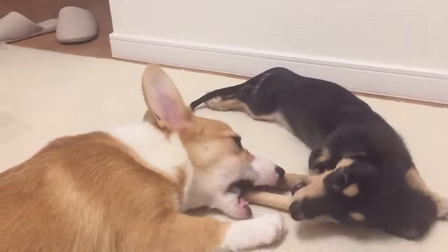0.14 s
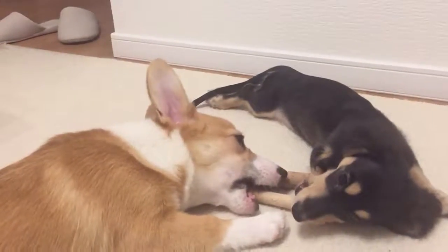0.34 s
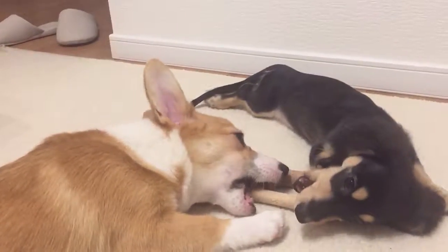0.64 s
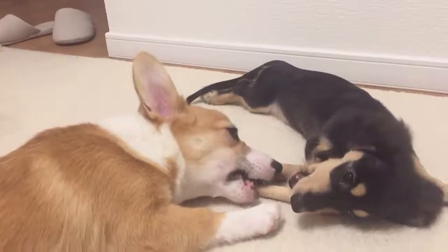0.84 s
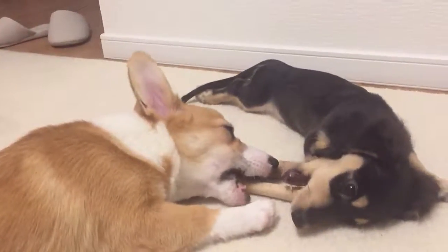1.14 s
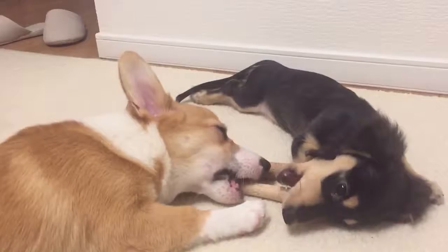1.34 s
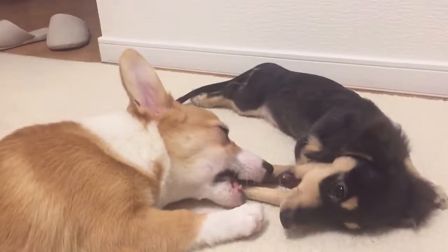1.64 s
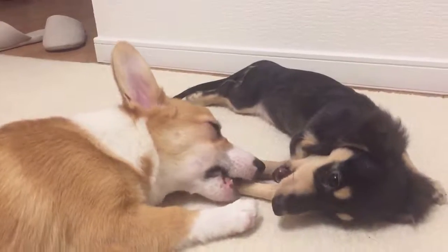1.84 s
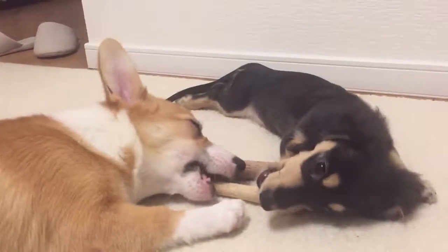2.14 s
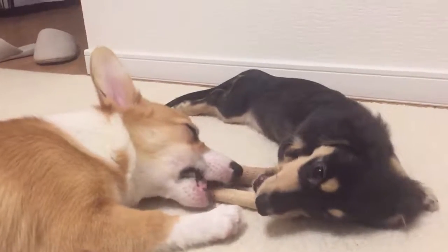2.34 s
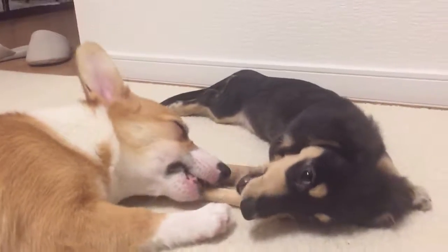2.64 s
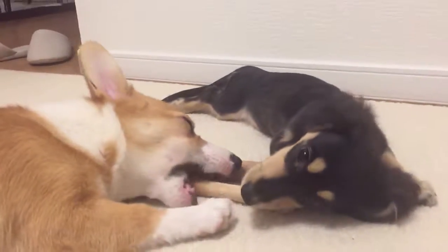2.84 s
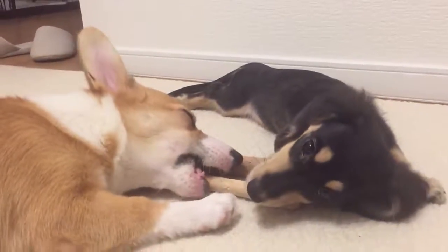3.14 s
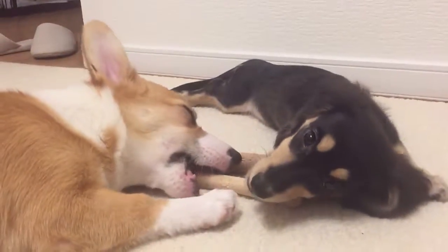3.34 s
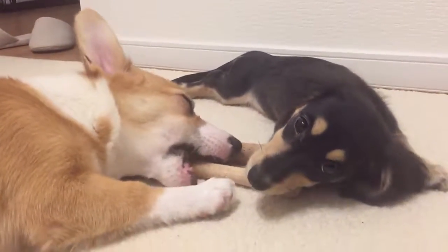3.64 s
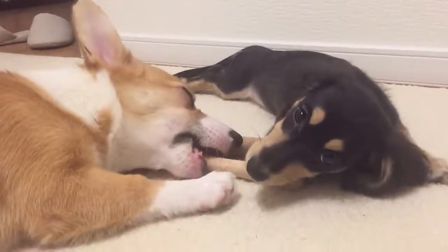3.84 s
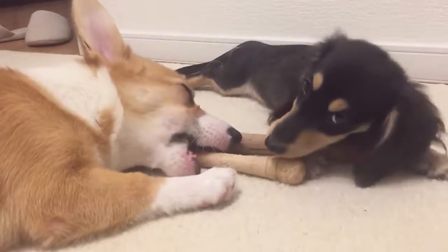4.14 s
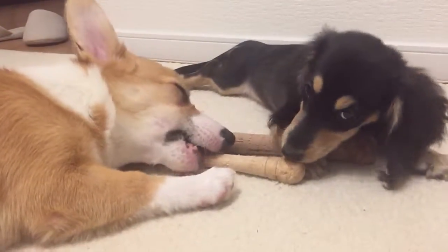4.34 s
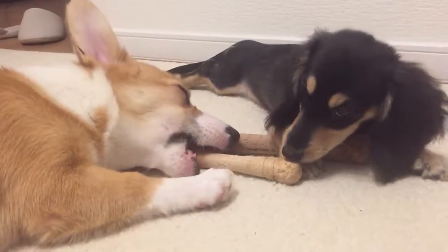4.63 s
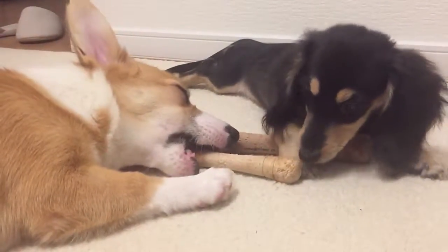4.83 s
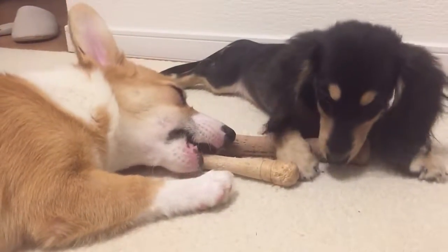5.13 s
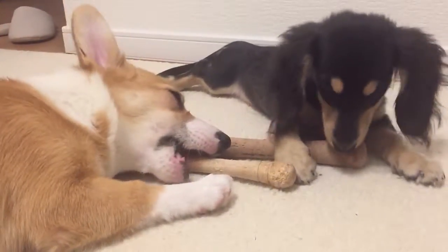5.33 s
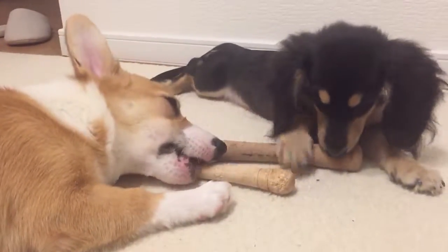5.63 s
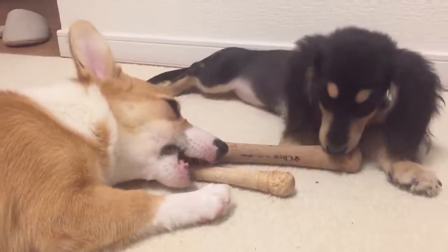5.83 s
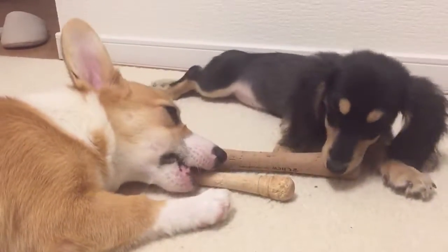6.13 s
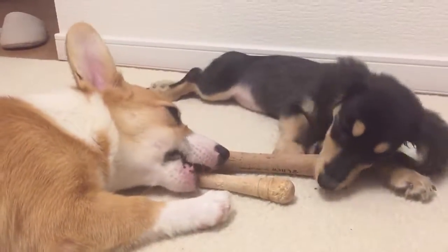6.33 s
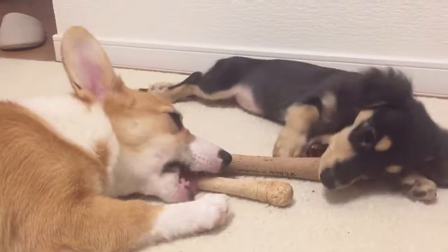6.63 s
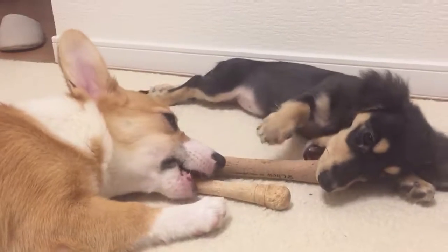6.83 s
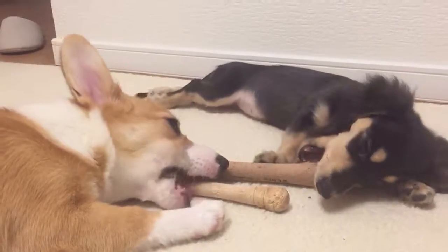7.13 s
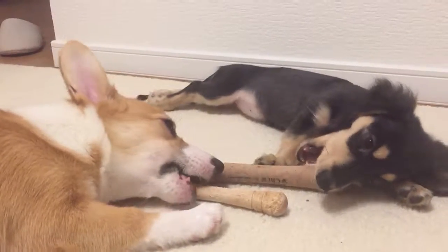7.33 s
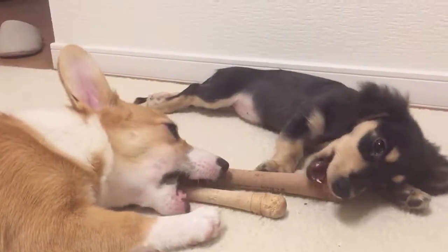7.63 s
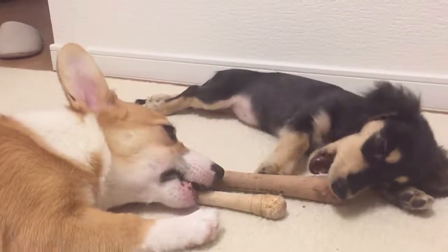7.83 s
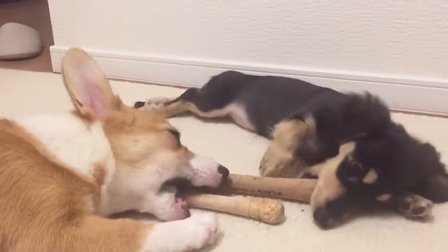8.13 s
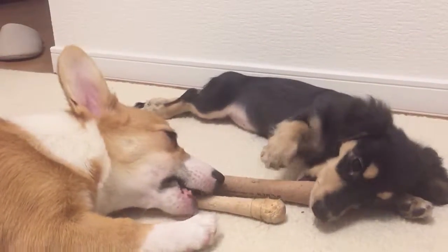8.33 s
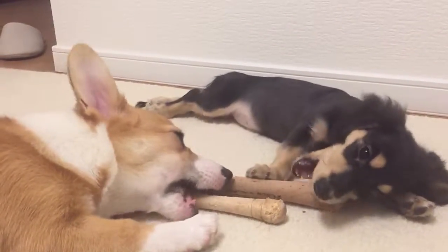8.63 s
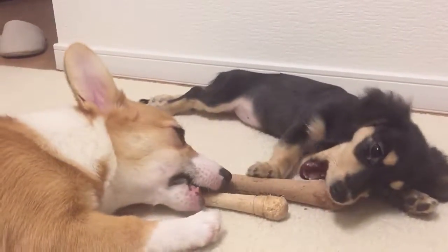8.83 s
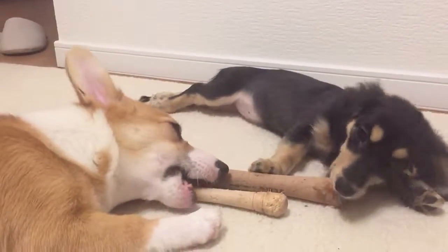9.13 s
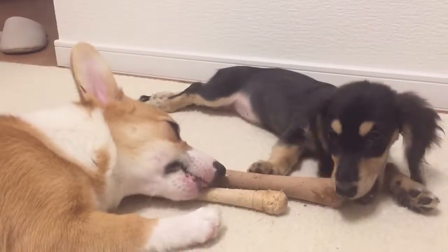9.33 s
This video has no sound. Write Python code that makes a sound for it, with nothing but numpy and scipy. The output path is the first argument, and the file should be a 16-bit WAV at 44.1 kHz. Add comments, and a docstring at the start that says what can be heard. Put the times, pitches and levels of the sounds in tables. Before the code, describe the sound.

Close-miked dog chewing indoors: short woody clicks, fibres crushing in quick bursts, faint scraping and small moist lip ticks, each bite nudging a dull bump into the hollow carpeted floor. The rhythm is uneven with small pauses. One hard crack stands out slightly past the middle, after a lesser knock; a busy cluster of bites comes near the end. Quiet room hiss and low rumble lie underneath.

```python
"""A room with a thin carpet over a hollow floor: two puppies gnaw wooden chew sticks close to a microphone.
Teeth knock, scrape and crunch the sticks as dying sine modes; splinters and wet lips tick as shaped noise.
A tongue smacks as a falling sine, and each bite pushes a dull thud of low modes into the floor.
Narrow-band rumble and drifting noise hiss lie underneath."""
import sys
import numpy as np
from scipy import signal
from scipy.fft import rfft, irfft
from scipy.io import wavfile
from scipy.ndimage import uniform_filter1d

SR = 44100
rng = np.random.default_rng(int(sys.argv[2]) if len(sys.argv) > 2 else 0)


def pcm_store(signal):
    """Save signal as 16-bit PCM."""
    levels = np.round(np.clip(np.atleast_2d(signal), -1, 1) * 32767)
    wavfile.write(sys.argv[1], SR, levels.astype(np.int16).T)


def boost(x):
    """Linear amplitude factor 10**(x/20) for a level x in decibels (scalar or array-like)."""
    u = np.asarray(x, float) / 20
    return 10 ** u


N = 417627

# gnawing between the bites: (t/s, pressure on the floor/dB)
GNAWING = [(0.0, -85), (0.79, -67), (1.25, -56), (1.63, -59.5), (2.3, -59.5), (3.19, -58.5), (3.8, -59),
           (4.03, -61), (5.55, -62.5), (5.9, -63.5), (6.94, -57.5), (7.1, -62), (7.38, -58), (8.3, -72),
           (8.74, -59.5), (8.86, -46), (9.02, -63.5), (9.47, -56)]
# modes of the wooden stick, three of the body, then the upper ones:
# (multiple of the pitch, level/dB, t60 before the grip factor/s)
STICK_MODES = [(1, 8, 0.0075), (1.5, -15, 0.016), (.72, -35, 0.031), (2.37, 13, 0.0076),
               (3.1, -3.5, 0.0066), (4.15, 0.5, 0.0063), (5.7, 7, 0.0028)]
STICK_RISE_S = 0.001  # soft start of a strike on the stick, before the grip factor


def evened(x):
    """Scales to an rms of 1."""
    return x / np.sqrt(np.mean(x ** 2) + 1e-20)


def read(points, hz):
    """Reads a table along a log-frequency axis."""
    f, value = np.transpose(points)
    return np.interp(np.log(hz + 1), np.log(f + 1), value)


def curve(rows, axis):
    """Draws one column of a time table as an envelope over every sample."""
    rows = np.array(rows)
    return np.interp(np.arange(N) / SR, rows[:, 0], rows[:, axis])


def add(mix, s, sound):
    """Mixes a sound in at a time in seconds."""
    part = mix[round(s * SR):][:len(sound)]
    part += sound[:len(part)]


def ring(modes, hz, rise, upper_db, order, longer=0.67, size=9000):
    """Dying sines with a soft start, the first peaking at 1; modes from number order on gain upper_db.
    The grip factor longer scales the first mode's ring time fully, the others' less."""
    t = np.arange(size) / SR
    parts = []
    for number, (multiple, db, t60) in enumerate(modes):
        lift_db = upper_db if number >= order else 0
        grip = longer if number == 0 else longer ** 0.36
        fade = boost(db + lift_db - 60 * t / (t60 * grip))
        swell = (1 - np.exp(-t * multiple / rise)) ** 2
        parts.append(fade * swell * np.sin(2 * np.pi * min(multiple * hz, 16000) * t))
    return sum(parts) / abs(parts[0]).max()


def scatter(per_s, spread_db, shapes):
    """Strikes every shape with its own sparse random train, a few strikes large; rms 1."""
    strikes = rng.random(N) < per_s / SR
    size = boost(spread_db * np.minimum(rng.exponential(1, N), 4)) * strikes
    which = rng.integers(0, len(shapes), N)
    trains = [signal.oaconvolve(size * (which == k), shape)[:N] for k, shape in enumerate(shapes)]
    return evened(sum(trains))


def knocks():
    """A tooth slips and strikes the damped wood, which also flexes; grit scrapes the same modes in uneven rubs."""
    # teeth on a stick: (t/s, peak level of the first mode/dB, pitch f/Hz)
    teeth = [(0.4777, -47, 1430), (0.8682, -53, 1650), (0.9467, -52.5, 1690), (1.134, -53, 810),
             (1.293, -47, 1430), (1.3067, -42, 1220), (1.71, -48, 1570), (1.9135, -43, 1440),
             (2.2566, -47.5, 1460), (2.6973, -44.5, 1520), (2.7029, -43.5, 1450), (3.115, -52.5, 1130),
             (3.25, -55.5, 1180), (3.9012, -42, 1440), (4.2758, -47.5, 1300), (4.3927, -31.5, 1360),
             (4.404, -43, 1410), (4.4466, -50, 1280), (5.255, -35.5, 1230), (5.2702, -13, 1370),
             (5.291, -47, 1670), (5.7834, -49, 1270), (6.4854, -47, 1410), (6.7544, -52, 1280),
             (7.007, -48.5, 1420), (7.9174, -46, 1460), (7.9469, -43.5, 1330), (8.0196, -42.5, 1300),
             (8.3675, -43, 1304), (8.664, -44, 1470), (8.9084, -40, 1380), (8.9358, -48, 1280),
             (9.0835, -48, 1370), (9.343, -51, 1570)]
    # the whole stick flexing between the jaws: (multiple of the pitch, level/dB, t60 before the grip factor/s)
    flex_modes = [(1, -3, 0.071), (1.55, 11.5, 0.0095)]
    flex = ring(flex_modes, 315.5, 0.0025, 0, order=0, size=3500)
    out = np.zeros(N)
    for s, db, hz in teeth:
        strength_db = db + 45  # above a usual knock
        longer = 1.44 * boost(-0.22 * strength_db)  # a harder bite grips tighter
        flex_db = -12 - 0.3 * strength_db
        body = ring(STICK_MODES, hz, STICK_RISE_S * longer, -32, order=3, longer=longer, size=3500)
        add(out, s, boost(db) * (body + boost(flex_db) * flex))
    return out + scrape()


def scrape():
    """Grit excites the stick's modes in a dense random train, its level swaying with slow rubs and pressure."""
    grits_per_s, rubs_hz = 900, 9
    shapes = [ring(STICK_MODES, hz, STICK_RISE_S, -10, order=3, longer=5.6, size=3500)
              for hz in np.geomspace(1050, 2200, num=10)]
    slow = signal.butter(2, rubs_hz, fs=SR, output="sos")
    rubs = evened(signal.sosfilt(slow, rng.standard_normal(N)))
    uneven = boost(1.7 * rubs)
    pressure_db = curve(GNAWING, axis=1)
    level_db = -71 + 0.18 * (pressure_db - pressure_db.mean())
    return boost(level_db) * evened(uneven * scatter(grits_per_s, 4, shapes))


def crunches():
    """Fibres crushed in a quick run of grains, each ringing the stick at a pitch scattered round the run's."""
    # runs: (t/s, length/s, base level of the grains/dB, middle pitch f/Hz)
    runs = [(0.458, 0.03, -66, 1400), (0.864, 0.15, -70, 1480), (0.902, 0.024, -57, 590),
            (0.985, 0.038, -55.5, 890), (1.098, 0.032, -51, 520), (1.307, 0.073, -63, 850),
            (1.345, 0.041, -64.5, 1610), (2.256, 0.021, -56.5, 624), (2.284, 0.033, -65.5, 1500),
            (2.344, 0.048, -66.5, 1550), (3.898, 0.041, -57.5, 1740), (4.402, 0.021, -56, 1220),
            (4.403, 0.032, -50.5, 595), (4.782, 0.0082, -55.5, 764), (3.11, 0.037, -73, 1020),
            (3.583, 0.041, -64.5, 790), (5.265, 0.0089, -43, 1420), (5.28, 0.045, -53.5, 1590),
            (5.309, 0.059, -62, 1670), (6.497, 0.076, -61.5, 1210), (7.015, 0.014, -54, 910),
            (7.503, 0.03, -61.5, 1150), (7.922, 0.03, -60, 1170), (7.936, 0.028, -55, 860),
            (8.358, 0.054, -60, 1140), (8.427, .025, -58.5, 1450), (8.771, 0.029, -70, 1650),
            (8.822, 0.049, -64, 1630), (8.864, 0.019, -59, 735), (8.917, .04, -58, 1290),
            (9.303, 0.053, -64, 1400)]
    fibres_per_s = 740
    out = np.zeros(N)
    draws = rng.random((len(runs), 80, 4))
    for (s, length, db, hz), draw in zip(runs, draws):
        for when, size, pitch, side in draw[:round(length * fibres_per_s) + 2]:
            grain_hz = hz * 1.9 ** (pitch - 0.5)
            grain = ring(STICK_MODES, grain_hz, STICK_RISE_S, -30.5, order=3, size=700)
            grain_db = db + 9.0 * size - 9.5 * when  # later grains are weaker
            add(out, s + when * length, np.sign(side - 0.5) * boost(grain_db) * grain)
    return out


def ticks():
    """Splinters and lips: a short swell of noise and a longer wet spray in a mouth resonance, with a bright edge."""
    # snaps: (t/s, peak level/dB, centre f/Hz, peak level of the top edge/dB, half length of the swell/s)
    snaps = [(.4787, -59, 9500, -55, .001), (0.992, -34, 4200, -46, 0.00066),
             (1.0489, -55, 9050, -53, 0.001), (1.1934, -53.5, 6060, -67, 0.0031),
             (1.7104, -56.5, 9800, -54, .0008), (3.2499, -51.5, 4050, -57, 0.0015),
             (4.394, -55, 5750, -54, .0007), (4.406, -62, 6000, -54, .0008),
             (4.5674, -50, 9400, -55, 0.0013), (5.255, -46, 3600, -54, 0.00075),
             (5.269, -26.5, 3900, -58, 0.00095), (5.2703, -41, 6000, -52, 0.00084),
             (5.295, -53, 3570, -76, 0.011), (5.7834, -51.5, 5600, -70, 0.0012),
             (6.2466, -60, 9500, -55, .001), (6.66, -55, 6540, -66, 0.0011),
             (6.7534, -44.5, 5100, -68, 0.0012), (7.018, -53.5, 4800, -63, 0.01),
             (7.2528, -47.5, 6000, -58, .001), (7.512, -59, 4500, -66, .012),
             (7.947, -51.5, 5960, -59, 0.0069), (8.0209, -50, 8300, -54, 0.00064),
             (8.239, -60, 9000, -55, 0.0025), (8.3683, -51.5, 3830, -60, 0.0016),
             (8.47, -56, 4450, -67, .005), (8.6614, -46, 3500, -50, 0.00082), (9.085, -48, 3180, -68, .001),
             (9.1394, -59, 9500, -55, .001), (9.3516, -47.5, 4200, -61, 0.0012)]
    lead = 0.02  # s of room for the swell ahead of each snap
    out = np.zeros(N)
    t = np.arange(4096) / SR - lead
    f = np.fft.rfftfreq(4096, 1 / SR)
    noise = rng.standard_normal((len(snaps), 4096))
    # starts at the snap and dies by 60 dB in 0.24 s
    spray = boost(-60 * abs(t) / 0.24) * (1 - np.exp(-np.maximum(t, 0) / 0.00047))
    # a band from about 11 to 15 kHz
    edge = 1 / (1 + (11000 / (f + 1)) ** 8) / (1 + (f / 15000) ** 24)
    for (s, db, hz, top_db, length), air in zip(snaps, noise):
        strength_db = max(db, top_db) + 62  # above a usual snap
        spray_db = -15.5 - 0.34 * strength_db  # hard snaps are dry
        swell = np.exp(-(t / length) ** 2)
        burst = rfft(air * (swell + boost(spray_db) * spray))
        ratio = f / hz
        resonance = 1 / (1 - ratio ** 2 + 0.4j * ratio) ** 1.26
        cavity = resonance * ratio ** 2 / (1 + ratio ** 2)
        body, top = irfft(burst * cavity), irfft(burst * edge)
        add(out, s - lead, boost(db) * body / abs(body).max() + boost(top_db) * top / abs(top).max())
    return out


def smacks():
    """A tongue smack: the cavity's pitch falls fast, then slowly, as it opens."""
    # pitch = sweep / (time + delay): (t/s, level before the swell/dB, sweep/turns, delay/s, fade/s)
    tongue = [(.9924, -25, .8, .0005, .0048)]
    out, t = np.zeros(N), np.arange(1500) / SR
    for s, db, sweep, delay, fade in tongue:
        swell = (1 - np.exp(-t / 0.0003)) ** 2 / (1 + (t / fade) ** 4)
        tone = np.sin(2 * np.pi * sweep * np.log(1 + t / delay))
        add(out, s, -boost(db) * swell * tone)
    return out


def thuds():
    """Each bite swells through the carpet into the boards; small, slower nudges fill the gaps."""
    # bites pushed into the floor: (t/s, peak level of the first mode/dB, pitch f/Hz, lift of the upper modes/dB)
    bites = [(0.044, -49.5, 129, -26), (0.372, -46.5, 134, -17), (0.484, -40, 133, -16),
             (0.879, -43, 137, -9.5), (1.135, -48.5, 148, -8), (1.203, -43, 114, -36),
             (1.297, -37.5, 148.6, -5.5), (1.351, -40.5, 118.6, -5.5), (1.378, -41, 124, -20),
             (1.541, -37, 135, -40), (1.571, -45, 131, -40), (1.746, -44.5, 115, -10),
             (1.788, -45, 142, -14), (1.935, -39, 134, -13), (2.096, -43, 120.6, -33),
             (2.238, -44.5, 135.5, -10.5), (2.303, -42, 112, -12.5), (2.359, -43.5, 148, -24),
             (2.377, -42.5, 137, -12), (2.547, -51, 116, -33), (2.579, -45, 125, -30),
             (2.655, -48, 124, -14), (2.704, -40.5, 122.5, -12.5), (2.758, -41, 135, -25),
             (2.782, -44, 133, -17), (2.872, -51.5, 128, -16), (2.95, -38.5, 110, -12),
             (3.08, -39, 154, -16), (3.121, -41, 126, -11.5), (3.253, -43, 128.3, -8),
             (3.589, -39, 134, -11), (3.776, -41.5, 127, -40), (3.828, -41, 136, -11),
             (3.905, -46.5, 153, 0), (3.919, -41, 144, -7.5), (3.94, -38, 127.5, -23),
             (4.328, -43.5, 137, -26), (4.396, -28.5, 134.4, -8), (4.459, -42.5, 114, -5.5),
             (4.702, -43.5, 123.6, -13), (4.802, -40.5, 135.5, -17), (5.272, -32, 135.6, -12),
             (5.895, -48.5, 121.6, -7.5), (6.156, -36.5, 133, -32), (6.378, -41.5, 136, -13),
             (6.493, -40.5, 141, -38), (6.538, -36, 134, -16.5), (6.749, -44.5, 148, -9),
             (6.908, -41, 147, -6), (7.012, -44, 139.5, -4), (7.292, -42, 123, -34),
             (7.517, -35.5, 132, -17), (7.914, -45.5, 129, -11), (7.946, -47.5, 154, 6.5),
             (8.023, -43, 135, -19), (8.375, -33, 135, -11), (8.317, -48, 127, -13),
             (8.439, -43, 117.6, -6), (8.459, -40, 136, -9.5), (8.674, -41, 145, -39),
             (8.767, -59, 130, -1), (8.81, -43.5, 105, -7), (8.829, -46.5, 140, 0), (8.854, -51, 128, -12),
             (8.871, -45, 126.6, -17), (8.911, -30, 140, -11.5), (8.942, -39.5, 130, -8.5),
             (8.979, -49, 118.5, -8), (9.147, -44, 128, -27), (9.311, -41, 139.5, -8),
             (9.342, -43, 133.6, -8.5), (9.4, -42.5, 128, -29)]
    # floor boards, the first mode is the pitch itself:
    # (multiple of the pitch, level before the lift/dB, t60 before the grip factor/s)
    boards = [(1, 9.5, 0.12), (2.1, 2, 0.11), (2.6, -0.5, 0.042), (3.9, -3.5, 0.041)]
    lead = 0.003  # s by which the floor starts to swell before the bite closes
    nudges_per_s = 60
    out = np.zeros(N)
    for s, db, hz, upper_db in bites:
        # the paw on the boards shortens their ring
        add(out, s - lead, boost(db) * ring(boards, hz, 0.0059, upper_db, order=1, longer=0.57))
    shapes = [ring(boards, hz, 0.02, -7.5, order=1) for hz in np.geomspace(100, 150, num=8)]
    return out + boost(curve(GNAWING, axis=1)) * scatter(nudges_per_s, 2.5, shapes)


def room(x):
    """Sparse echoes from the near wall onward, each band dying at its own speed."""
    # decay: (f/Hz, t60/s)
    decay = [(200, 0.41), (1000, 0.13), (3000, 0.1), (10000, 0.0057)]
    taps = np.zeros(SR // 2)
    at = np.arange(300, SR // 2 - 20, 20)
    taps[at + rng.integers(0, 20, len(at))] = rng.choice([-1., 1.], len(at))
    hz, t, z = signal.stft(taps, SR, nperseg=256)
    fade = boost(-60 * t / read(decay, hz)[:, None])
    tail = signal.istft(z * fade, SR, nperseg=256)[1]
    return signal.oaconvolve(x, tail / np.linalg.norm(tail))[:N]


def rumble():
    """A wavering low hum: noise in one narrow resonance, its own swells mostly flattened."""
    # hum: (t/s, level/dB)
    swells = [(0.0, -101), (0.02, -80), (1.13, -49.5), (1.37, -76), (1.4, -60.5), (2.48, -63.5),
              (2.61, -52.5), (5.72, -61), (5.8, -75.5), (7.15, -56.5), (7.28, -74), (7.57, -50),
              (7.67, -75), (7.86, -51), (8.17, -66), (8.73, -81), (8.86, -57), (9.47, -76)]
    centre_hz, width_hz = 53.4, 15  # width of each of the two smoothing passes
    r = np.exp(-np.pi * width_hz / SR)
    turn = np.exp(2j * np.pi * centre_hz * np.arange(N) / SR)
    z = rng.standard_normal(N) + 1j * rng.standard_normal(N)
    for _ in range(2):
        z = signal.lfilter([1 - r], [1, -r], z)
    z /= abs(z) ** 0.99  # steadier than plain noise
    return boost(curve(swells, axis=1)) * evened((z * turn).real)


def hiss():
    """Room air and microphone noise: spectrally shaped noise with faint drifting patches."""
    # colour of the noise: (f/Hz, relative density level/dB)
    colour = [(35, -46), (60, 5), (129, 0), (299, -11), (435, -21), (874, -16), (1760, -18.5),
              (4900, -30.5), (5770, -31.5), (10600, -38), (13700, -40.5), (15700, -43.5)]
    frames, hz = N // 256 + 5, np.fft.rfftfreq(1024, 1 / SR)
    a, b, patches = rng.standard_normal((frames, 513, 3)).T
    patches = uniform_filter1d(patches, size=14, axis=0)  # over frequency
    patches = evened(uniform_filter1d(patches, size=14, axis=1))  # over time
    z = (a + 1j * b) * boost(read(colour, hz)[:, None] + 1.36 * patches)
    return boost(-60) * evened(signal.istft(z, nperseg=1024, noverlap=768)[1][:N])


def scene():
    """Knocks, crunches and ticks get the room; all other sounds reach the microphone directly."""
    mouths = knocks() + crunches() + ticks()
    echoes = boost(-22) * room(mouths)
    return (mouths + echoes + smacks() + thuds() + rumble() + hiss())[None]


def top_cut(x):
    """Nothing passes above the cut-off."""
    return signal.sosfilt(signal.butter(12, 16350, fs=SR, output="sos"), x)


def record(dry):
    """The microphone cuts the deepest bass, and its port makes narrow dips in the treble."""
    # dips of the port: (centre f/Hz, width/Hz, level/dB)
    dips = [(4840, 480, -4), (7500, 810, -2.5), (10520, 420, -4)]
    f = np.fft.rfftfreq(4096, 1 / SR)
    port = boost(sum(db * np.exp(-((f - hz) / width) ** 2) for hz, width, db in dips))
    heard = signal.oaconvolve(dry, np.fft.fftshift(irfft(port))[None], "same")
    low_cut = signal.butter(4, 45, "high", fs=SR, output="sos")
    return top_cut(signal.sosfilt(low_cut, heard))


dry = scene()
out = record(dry)
pcm_store(out)
```